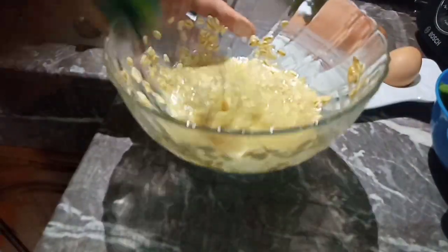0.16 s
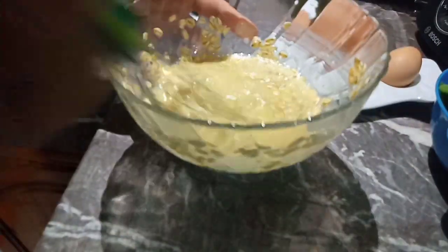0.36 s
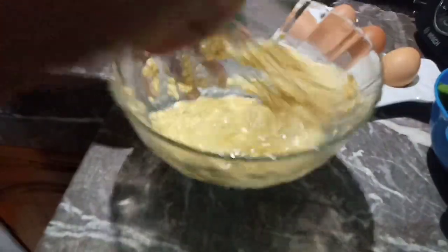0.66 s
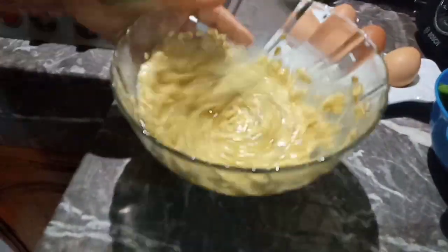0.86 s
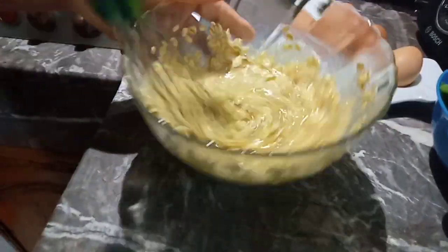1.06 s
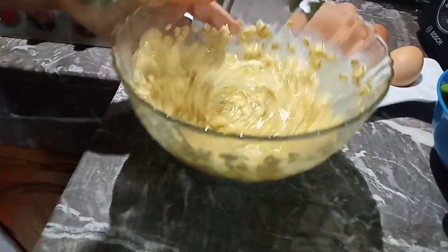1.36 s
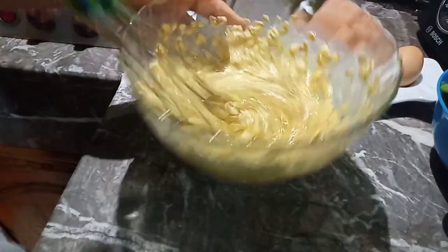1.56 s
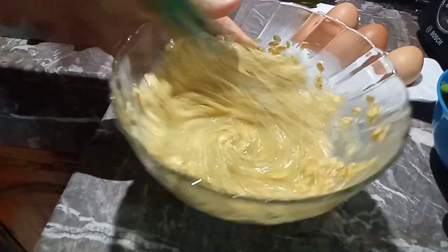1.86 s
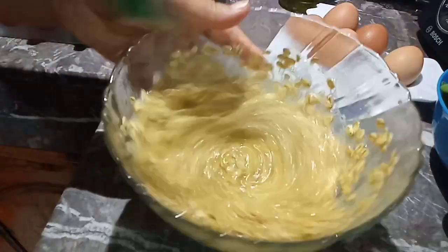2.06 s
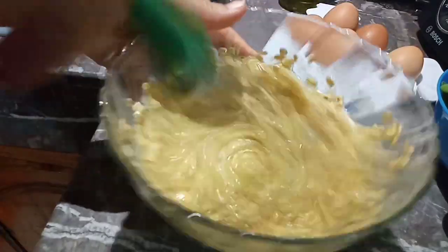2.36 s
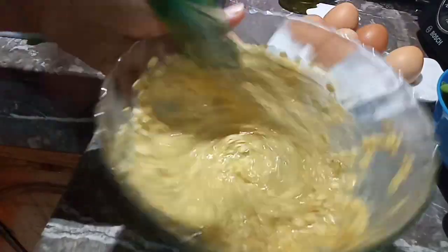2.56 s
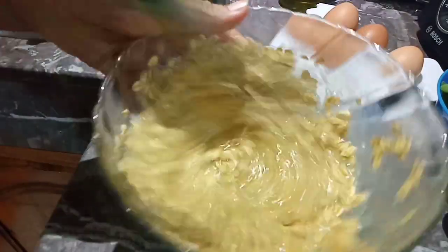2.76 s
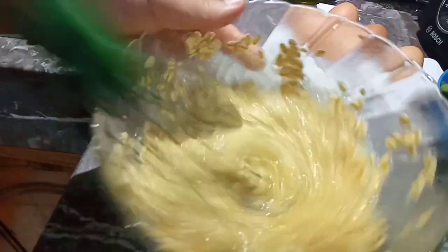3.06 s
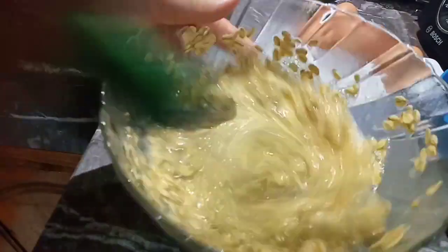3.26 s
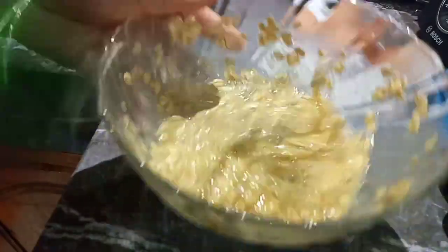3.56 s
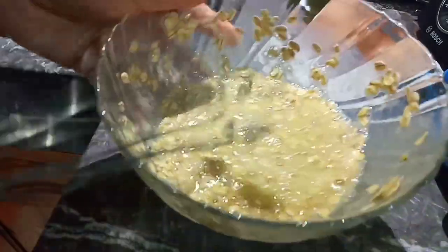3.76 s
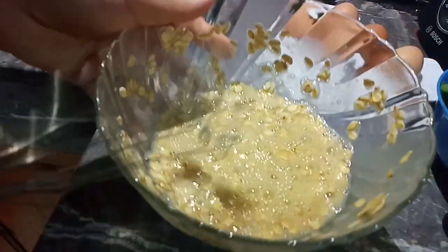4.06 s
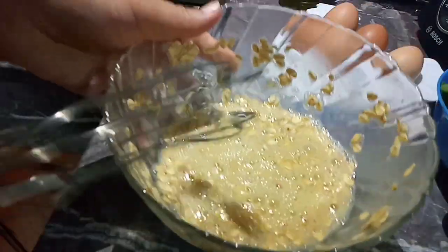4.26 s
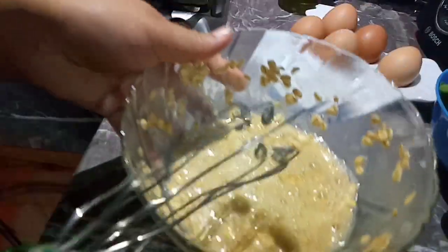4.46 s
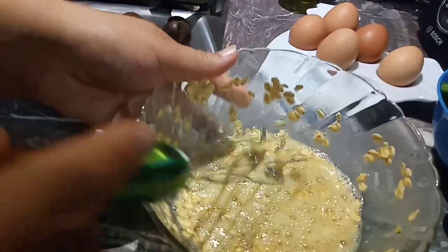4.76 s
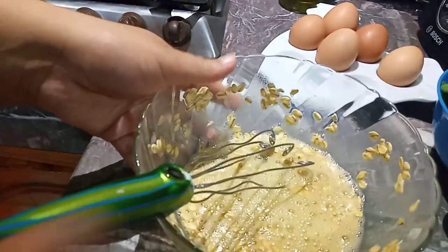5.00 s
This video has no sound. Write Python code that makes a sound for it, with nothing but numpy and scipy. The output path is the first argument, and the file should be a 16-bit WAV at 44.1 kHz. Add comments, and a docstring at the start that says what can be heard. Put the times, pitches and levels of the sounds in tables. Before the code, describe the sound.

Close by, a couple of bright taps on a glass bowl lead into fast, rhythmic whisking of egg and oats: sticky squelches, small pops and muted wire clicks, with an occasional dull bump of the bowl. The whisking dies away into light ringing taps, then one loud clack and a quick cluster of knocks with a glassy rattle. A small kitchen's steady background noise lies underneath.

```python
"""A small kitchen: a wire whisk stirs oats into beaten egg in a glass bowl, about four turns a second.
The wet mix squelches, sloshes and pops; the wires tick and scrape on glass damped by the mix.
Before and after stirring the whisk taps the bare glass, which rings. The bowl bumps its support.
At the end come a few hard knocks, with a brief glassy ring and rattle. Steady room noise throughout."""
import sys
import numpy as np
from scipy import signal
from scipy.fft import rfft, irfft, next_fast_len
from scipy.io import wavfile
from scipy.ndimage import uniform_filter1d, minimum_filter1d

SR = 44100
rng = np.random.default_rng(int(sys.argv[2]) if len(sys.argv) > 2 else 0)


def digitize_waveform(pressure):
    """Quantize a signal to 16-bit integers and store it at the path in sys.argv[1].

    Rows of a 2-D input are taken as channels; values are limited to [-1, 1].
    """
    field = np.atleast_2d(pressure).T
    bounded = np.clip(field, -1, 1)
    quanta = np.round(bounded * 32767).astype(np.int16)
    wavfile.write(sys.argv[1], SR, quanta)


N = 226277
AGE_S = np.arange(SR // 2) / SR  # time since a blow

# Levels in all tables are relative.
# Whisk sweeps. Each row: centre in seconds, squelch level in dB, half length in seconds.
SWEEPS = [(0.155, -37, 0.022), (0.396, -38.5, 0.027), (0.679, -36, 0.035), (0.897, -39, 0.047),
          (1.035, -33.5, .016), (1.277, -40, .04), (1.507, -35, 0.035), (1.758, -34, 0.016),
          (1.986, -33, 0.019), (2.217, -33.5, .03), (2.445, -30, 0.015), (2.659, -32, 0.03),
          (2.877, -27.5, 0.015), (3.098, -28, 0.014), (3.328, -29, .021)]
# Motion of the mix between sweeps. Each row: time in seconds, squelch level in dB.
CHURN_CURVE = [(0.45, -47.5), (0.56, -45.5), (1.08, -35.5), (1.45, -37), (2.33, -34.5), (2.77, -32),
               (3.2, -33), (3.42, -40), (3.65, -41.5)]
# Wires catching under the mix. Each row: start in seconds, level in dB, wire pitch in Hz,
# body in dB, treble in dB.
WIRE_TICKS = [(0.385, -22, 3586, -6, -7), (0.666, -28, 1630, 17, 2.5), (0.7253, -24.5, 3600, -1, -2),
              (0.7945, -26.5, 3310, 3, -3), (0.9038, -20, 2570, 1, -5.5), (0.9834, -25.5, 1820, 0, -11.5),
              (1.0223, -22.5, 3410, -11, 0.5), (1.035, -22, 3230, -18, 0.5), (1.0691, -30, 3300, 16, 3),
              (1.1628, -24, 2540, -2, -3), (1.179, -22.5, 1680, 0, -8), (1.2141, -31.5, 3640, 13, 4),
              (1.2695, -19, 3580, 1, -5), (1.3262, -20.5, 1850, 6, -3.5), (1.483, -21.5, 2640, 11, -5),
              (1.5287, -24, 3570, 14, 0), (1.6801, -24, 3620, 12.5, -2.5), (1.7642, -26, 3700, 18.5, 0),
              (1.867, -25, 3500, 8, -6.5), (1.9874, -26, 3500, -3, 4), (2.141, -30, 3630, 22, 3.5),
              (2.2144, -15, 3444, -6, -3.5), (2.3437, -33, 3720, 11, 1.5), (2.4483, -16, 3290, 12, 4),
              (2.585, -24, 3370, -3, -7.5), (2.611, -24.5, 2700, -5, -9), (2.6517, -25.5, 3230, 14, -6),
              (2.666, -20.5, 3170, 14, 8), (2.8775, -20.5, 2726, 10, -1.5), (2.8978, -23, 3230, -8, 1.5),
              (2.9363, -26.5, 1740, 17, -5), (3.0302, -19, 3260, 10.5, -5.5), (3.1038, -22, 3260, 4, 4),
              (3.2201, -23.5, 2700, 16.5, -1.5), (3.3039, -20.5, 3200, 10, -20),
              (3.3213, -20.5, 3370, 17.5, 2.5), (3.3441, -24, 3390, -3, 0)]
# Whisk on bare glass. Each row: start in seconds, level in dB, body in dB, treble in dB,
# wire pitch in Hz, rebound in dB against the tap.
GLASS_TAPS = [(0.07, -11, -5.5, -2, 3685, -39), (0.3145, -8.5, -7, -2, 3660, -25),
              (0.5421, -21.5, -9, 6, 3400, -17), (3.6653, -22, -1.5, 6.5, 2500, -2),
              (3.8384, -26, 6, 9.5, 3783, 1.5), (3.92, -22, 5.5, 8.5, 3630, -1.5),
              (4.0441, -18, 2, 4, 3825, -3.5), (4.1692, -14.5, 1.5, 4, 3856, 0.5),
              (4.4922, -35, 11, 4, 3670, -11)]
# Air pockets and drops. Each row: start in seconds, level in dB, pitch in Hz.
MIX_POPS = [(1.9375, -13, 2850), (2.4968, -17.5, 1700), (2.7325, -20, 2900), (2.797, -29, 780),
            (3.107, -27, 640), (3.2498, -11, 3100), (3.667, -28, 510)]
# Bowl against its support. Each row: start in seconds, level in dB.
BOWL_BUMPS = [(0.312, -33), (2.449, -22.5), (2.665, -30.5), (4.181, -33)]
# Closing knocks. Each row: start in seconds, clack level in dB, clack pitch in Hz,
# clack T60 in seconds, glass level in dB, rattle and body level in dB.
HARD_KNOCKS = [(4.738, 5, 1666, 0.0083, -28.5, -9.5), (4.7387, -31.5, 4310, 0.06, -49, -27),
               (4.7605, -23, 1470, 0.0075, -56, -25), (4.9397, -27, 1470, 0.061, -20, -21.5),
               (4.957, -19, 1480, 0.015, -19, -20), (5.007, -10.5, 1640, 0.013, -31, -19.5),
               (5.011, -4, 2330, 0.0061, -24.5, -17), (5.018, -18, 1294, 0.12, -22, -18.5)]

# Modes. Each row: frequency in Hz, level in dB, T60 in seconds.
GLASS_MODES = [(545, -19, .13), (640, -21, .16), (1372, -7, .18), (1408, -11, .13), (1648, -12, .15),
               (2368, -1, .13), (2415, -5, .1), (2510, -8, .07), (3100, -17, .07), (3590, -7, .12),
               (3665, -7, .08), (3900, -12, .07), (4400, -22, .09), (5030, -18, .09), (6230, -24, .08),
               (6700, -19, .11), (8530, -18, .11), (10610, -25, .09), (12780, -27, .08), (15350, -24, .07)]  # close pairs beat
WIRE_MODES = [(1695, -10.5, 0.015), (2435, 1.5, 0.098), (2640, -43, 0.0088), (3120, -40, 0.0034),
              (3630, -6, 0.13), (4955, -8, 0.031)]
KNOCK_BODY_MODES = [(180, -22, 0.25), (237.6, -15, 0.49), (630, -4.5, 0.33), (774, -13, 0.17),
                    (802, -11.5, 0.73), (931, 0.5, 0.11), (1020, -14, 0.27), (1278, 0.5, 0.13),
                    (1980, -12, 0.23), (2250, -12.5, .22), (4400, -32, .2)]  # lower, longer ring after a knock
THUD_MODES = [(75, -7, .035), (120, -2, .028), (190, 1, .022), (330, -2, .018)]

# Spectra. Each row: frequency in Hz, gain in dB.
ROOM_NOISE_EQ = [(15, -94), (25, -34), (108, 0), (285, -10), (416, -15.5), (503, -10.5), (677, -14.5),
                 (734, -7.5), (863, -19), (1040, -15), (1740, -13.5), (4030, -11), (5570, -37.5),
                 (7110, -31.5), (16000, -59)]
SQUELCH_EQ = [(900, -28.5), (1400, -5.5), (1820, 2.5), (2200, -3.5), (2700, 2), (3350, 2.5), (4000, -1.5),
              (5200, -19), (7000, -30), (12000, -68.5)]
SLOSH_EQ = [(100, -38.5), (250, -7), (430, -16.5), (560, -4), (780, 2), (1050, 2), (1350, -8), (1900, -1),
            (4000, -63.5)]
SCRAPE_EQ = [(3000, -8), (5300, 0), (7600, 0.5), (9000, -8), (11000, -10.5), (14000, -12.5), (15400, -11)]
SQUEAK_EQ = [(5600, -0.5), (6400, 2), (7650, -2), (8300, 11.5), (8900, 5), (9500, 8), (10500, 1),
             (11400, 4.5), (11900, -2), (13000, 1), (13600, 9.5), (14600, -1.5), (15400, 5)]  # high resonances of wire rubbed on glass
CONTACT_EQ = [(80, -23.5), (400, -30.5), (800, -8.5), (1800, 0), (2200, -9), (3400, 6), (4200, -0.5),
              (5500, -10.5), (8400, -16.5), (11000, -19.5), (12200, -23.5), (15000, -23.5)]  # wire striking glass
RATTLE_EQ = [(30, -60), (70, -23), (170, -4), (400, -7), (650, 1), (1100, -1.5), (1600, -3.5), (2400, -7.5),
             (3300, -14.5), (4400, -27), (5300, -55), (10000, -62), (15000, -69.5)]
BLUNT_BLOW_EQ = [(50, -27), (500, 17.5), (1400, 7), (2400, -5.5), (3600, -13), (5000, -11.5), (6700, -24),
                 (9000, -27), (15000, -45)]
THUD_EQ = [(20, -22), (60, 4), (500, 7), (2000, -36)]
CLACK_EQ = [(40, -41), (400, -1.5), (4400, 5.5), (6500, -14), (12000, -18)]
KNOCK_BODY_EQ = [(40, -15.5), (160, 1.5)]
BARE_GLASS_EQ = [(600, 4.5), (1400, 0), (2400, 0), (3600, 3), (5000, 4.5), (9000, 0)]

# Room decay. Each row: frequency in Hz, T60 in seconds.
ROOM_T60 = [(150, 0.56), (1000, 0.51), (4000, 0.38), (9000, 0.26), (15000, 0.34)]


def amp(db):
    """Decibels to gain."""
    return 10 ** (np.asarray(db) / 20)


def unit_rms(x):
    """Scale to rms 1."""
    return x / np.sqrt(np.mean(x ** 2) + 1e-20)


def log_interp(points, hz):
    """Read (Hz, value) points on a log frequency axis."""
    point_hz, values = np.transpose(points)
    return np.interp(np.log(hz + 1), np.log(point_hz), values)


def add(track, start_s, sound):
    """Mix a sound into the track."""
    start = max(round(start_s * SR), 0)
    part = sound[:max(N - start, 0)]
    track[start:start + len(part)] += part


def colour(x, *spectra):
    """Minimum-phase filter from summed (Hz, dB) spectra."""
    size = 2 * next_fast_len(len(x) // 2 + 2048)
    hz = np.fft.rfftfreq(size, 1 / SR)
    gain = amp(sum(log_interp(eq, hz) for eq in spectra))
    cepstrum = irfft(np.log(gain), size)
    cepstrum[1:size // 2] *= 2
    cepstrum[size // 2 + 1:] = 0
    return irfft(rfft(x, size) * np.exp(rfft(cepstrum)), size)[:len(x)]


def ring(modes, scatter_db):
    """Damped modes; each contact point gives new strengths and signs."""
    hz, db, t60_s = np.transpose(modes)[:, :, None]
    strength = amp(db + scatter_db * rng.standard_normal(hz.shape)) * rng.choice([-1, 1], hz.shape)
    return np.sum(strength * amp(-60 * AGE_S / t60_s) * np.sin(2 * np.pi * hz * AGE_S), 0)


def chatter(t60_s, hold_s=0):
    """Tiny contacts: a noise burst that holds, then decays."""
    return rng.standard_normal(len(AGE_S)) * amp(-60 * np.maximum(AGE_S - hold_s, 0) / t60_s)


def blow_note(hz, t60_s):
    """Main note of a blow, swelling over the brief contact."""
    attack = 1 - np.exp(-AGE_S / .0006)
    return np.sin(2 * np.pi * hz * AGE_S) * amp(-60 * AGE_S / t60_s) * attack


def contact_point(depth_db):
    """Random (Hz, dB) spectrum: each spot on the whisk favours other high resonances."""
    hz = np.arange(3900, 16000, 130)
    treble = hz > hz[0]
    db = depth_db * np.clip(rng.standard_normal(len(hz)), -2, 1.6) * treble
    mean_db = 10 * np.log10(np.mean(amp(db) ** 2))
    return np.transpose([hz, db - mean_db * treble])


def crackle(per_s, spread_db, hiss):
    """Uneven snaps, each 1 ms of tearing, over smooth hiss; rms 1."""
    size = amp(spread_db * np.minimum(rng.exponential(size=N), 4))
    snaps = (rng.random(N) < per_s / SR) * size ** 2
    energy = signal.lfilter([1], [1, -np.exp(-1000 / SR)], snaps)
    return unit_rms(np.sqrt(energy / energy.mean() + hiss ** 2) * rng.standard_normal(N))


def pings(per_s, centre_hz, cycles, spread_db, rise):
    """Tiny random pings of a few cycles, rising in pitch for bubbles; rms 1."""
    starts = np.flatnonzero(rng.random(N) < per_s / SR)
    hz = np.minimum(centre_hz * np.exp(0.353 * rng.standard_normal(N)[starts, None]), SR / 2)
    size = amp(spread_db * np.minimum(rng.exponential(size=N)[starts, None], 3))
    periods = hz * AGE_S[:SR // 60]
    envelope = np.exp(-periods / cycles) - np.exp(-4 * periods / cycles)
    waves = size * envelope * np.sin(2 * np.pi * periods * (1 + rise * periods / cycles))
    samples = starts[:, None] + np.arange(periods.shape[1])
    return unit_rms(np.bincount(samples.ravel(), waves.ravel(), N)[:N])


def room_noise(rms_db=-48):
    """Steady noise, strongest in the bass."""
    return amp(rms_db) * unit_rms(colour(rng.standard_normal(N), ROOM_NOISE_EQ))


def room_reverb(x):
    """Diffuse tail of a small hard room, 5 ms late; treble dies first."""
    hz, t_s, noise = signal.stft(rng.standard_normal(SR // 2), SR, nperseg=256)
    decay = amp(-60 * t_s / log_interp(ROOM_T60, hz)[:, None])
    tail = signal.istft(noise * decay, SR, nperseg=256)[1]
    tail = np.pad(tail / np.linalg.norm(tail), (SR // 200, 0))
    return signal.fftconvolve(x, tail)[:N]


def bowl_bumps():
    """Hard strokes push the bowl against its support: dull thuds."""
    out = np.zeros(N)
    for start_s, db in BOWL_BUMPS:
        add(out, start_s, amp(db - 5) * colour(ring(THUD_MODES, scatter_db=1), THUD_EQ))
    return out


def hard_knocks():
    """Hard, blunt blows: a clack, a brief glassy ring, a rattle and a lower ring of the struck body."""
    out = np.zeros(N)
    for start_s, clack_db, hz, t60_s, glass_db, rattle_db in HARD_KNOCKS:
        clack = amp(clack_db + 1.5) * colour(blow_note(hz, t60_s), CLACK_EQ)
        glass = amp(glass_db - 4.5) * colour(ring(GLASS_MODES, scatter_db=5), BLUNT_BLOW_EQ)
        rattle = amp(11) * colour(chatter(t60_s=0.042) + 0.33 * chatter(t60_s=0.45), RATTLE_EQ)
        body = amp(-11) * colour(ring(KNOCK_BODY_MODES, scatter_db=1.5), KNOCK_BODY_EQ)
        add(out, start_s, clack + glass + amp(rattle_db) * (rattle + body))
    return out


def glass_taps(rebound_s=0.011, damping_db_per_s=110):
    """Wires strike bare glass and spring back on it once; a hand on the rim shortens the ring."""
    out = np.zeros(N)
    hand = amp(-damping_db_per_s * AGE_S)
    for tap_s, tap_db, body_db, treble_db, hz, rebound_db in GLASS_TAPS:
        tone_eq = [(1500, body_db), (2200, 0), (4200, 0), (7000, treble_db)]
        for start_s, db in [(tap_s, tap_db), (tap_s + rebound_s, tap_db + rebound_db)]:
            spot_eq = contact_point(depth_db=7)
            crack = amp(-2) * colour(chatter(t60_s=0.031, hold_s=0.002), CONTACT_EQ, spot_eq)
            steel = amp(-11) * ring(WIRE_MODES, scatter_db=0.5) + amp(-3) * blow_note(hz, t60_s=0.052)
            glass = amp(-13) * colour(ring(GLASS_MODES, scatter_db=1.5), BARE_GLASS_EQ)
            add(out, start_s, amp(db) * colour(crack + (steel + glass) * hand, tone_eq))
    return out


def mix_pops(t60_cycles=38):
    """Trapped air bursts or a drop falls back: a small, soft source with little bass or edge."""
    out = np.zeros(N)
    for start_s, db, hz in MIX_POPS:
        bubble = ring([(hz, 0, t60_cycles / hz), (hz * 0.64, -9, .007)], scatter_db=5)
        band_eq = [(hz / 8, -20), (hz / 2, 0), (hz * 1.3, 0), (hz * 4, -14)]
        add(out, start_s, amp(db) * colour(bubble, band_eq))
    return out


def grazes(per_sweep=2, spread_s=0.07, centre_hz=3020, body_db=6, treble_db=-1):
    """Light chance contacts around each sweep, following its level; rows as in WIRE_TICKS."""
    sweeps = np.repeat(SWEEPS, per_sweep, axis=0)
    chance = rng.uniform(-1, 1, (len(sweeps), 3))
    return [(at_s + spread_s * lag, db + 3 * force, centre_hz * np.exp(0.246 * note), body_db, treble_db)
            for (at_s, db, _), (lag, force, note) in zip(sweeps, chance)]


def wire_ticks():
    """A wire skids on the wall for a few milliseconds; the mix all but mutes the glass."""
    out = np.zeros(N)
    grip = 1 - np.exp(-AGE_S / 0.00027)
    for start_s, db, hz, body_db, treble_db in list(WIRE_TICKS) + grazes():
        spot_eq = contact_point(depth_db=6)
        skid = amp(2) * colour(grip * chatter(t60_s=0.031, hold_s=0.0016), CONTACT_EQ, SQUEAK_EQ, spot_eq)
        steel = amp(-19) * ring(WIRE_MODES, scatter_db=2.5) + amp(-0.5) * blow_note(hz, t60_s=0.043)
        glass = amp(-23) * ring(GLASS_MODES, scatter_db=0.5)
        tone_eq = [(900, body_db), (1900, 0), (4200, 0), (7000, treble_db)]
        add(out, start_s, amp(db) * colour(skid + steel + glass, tone_eq))
    return out


def whisk_motion(dip_lead_s=0.0713, dip_db=-7, lift_lag_s=0.105, lift_db=-1.5, settle_db_per_s=22):
    """Churn and sweep power: wires dip, sweep and lift; the mix settles while the whisk is out."""
    t_s = np.arange(N) / SR

    def swell(centre_s, half_s):
        return np.exp(-((t_s - centre_s) / half_s) ** 2)

    curve_s, curve_db = np.transpose(CHURN_CURVE)
    idle_s = np.abs(t_s - np.clip(t_s, curve_s[0], curve_s[-1]))
    lifted = sum(swell(at_s + lift_lag_s, half_s=0.026) for at_s, _, _ in SWEEPS)
    churn_db = np.interp(t_s, curve_s, curve_db) - 5.5 + lift_db * lifted - settle_db_per_s * idle_s
    sweep_power = np.zeros(N)
    for at_s, db, half_s in SWEEPS:
        dip = amp(dip_db) ** 2 * swell(at_s - dip_lead_s, half_s=0.012)
        sweep_power += amp(db) ** 2 * (swell(at_s, half_s) + dip)
    return amp(churn_db) ** 2, sweep_power


def stirring(slosh_db=-6, churn_scrape_db=-20, sweep_scrape_db=-18.5):
    """Wet oats part in sticky snaps, egg sloshes, wires drag on glass; all swell with each sweep."""
    churn_power, sweep_power = whisk_motion()
    drag_power = churn_power.max() * (churn_power / churn_power.max()) ** 1.23  # slow wires hardly sound
    wet_gain = np.sqrt(churn_power + sweep_power)
    scrape_gain = np.sqrt(amp(churn_scrape_db) ** 2 * drag_power + amp(sweep_scrape_db) ** 2 * sweep_power)
    oats = crackle(per_s=500, spread_db=4.5, hiss=1.0)
    oats += 0.24 * pings(per_s=350, centre_hz=2614, cycles=6.5, spread_db=7.5, rise=0.022)
    egg = crackle(per_s=330, spread_db=1.5, hiss=0.88)
    egg += 0.1 * pings(per_s=180, centre_hz=954, cycles=2.4, spread_db=2.5, rise=0.023)
    friction = 0.74 * rng.standard_normal(N)
    friction += pings(per_s=700, centre_hz=9010, cycles=6.1, spread_db=3.5, rise=0)
    squelch = unit_rms(colour(oats, SQUELCH_EQ))
    slosh = amp(slosh_db) * unit_rms(colour(egg, SLOSH_EQ))
    scrape = unit_rms(colour(friction, SCRAPE_EQ, SQUEAK_EQ))
    return wet_gain * (squelch + slosh) + scrape_gain * scrape


def scene():
    """Whisk, mix and bowl close by, over reverb and room noise; mono."""
    whisking = stirring() + wire_ticks() + mix_pops()
    taps, knocks = glass_taps(), hard_knocks()
    reverb = room_reverb(amp(-10.5) * whisking + amp(-9) * taps + amp(-16) * knocks)
    return (room_noise() + reverb + bowl_bumps() + knocks + taps + whisking)[None]


def record(dry):
    """Look-ahead peak limiter, then a brick-wall low-pass."""
    ceiling, window_samples, cutoff_hz = 0.9, 200, 15550
    needed_gain = ceiling / np.maximum(np.abs(dry), ceiling)
    gain = uniform_filter1d(minimum_filter1d(needed_gain, window_samples), window_samples)
    size = next_fast_len(N + SR // 2)
    passband = np.fft.rfftfreq(size, 1 / SR) < cutoff_hz
    return irfft(rfft(dry * gain, size) * passband, size)[..., :N]


dry = scene()
out = record(dry)
digitize_waveform(out)
```